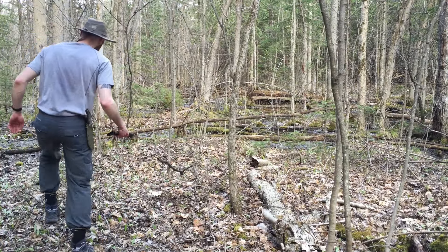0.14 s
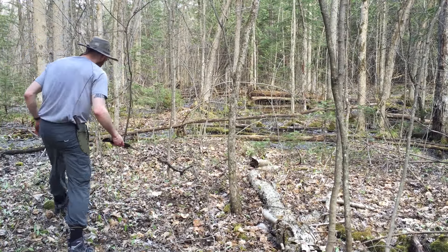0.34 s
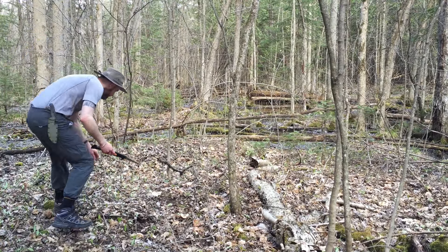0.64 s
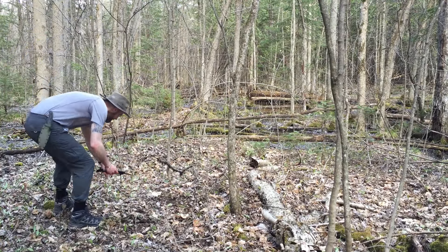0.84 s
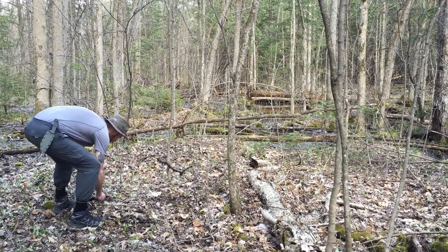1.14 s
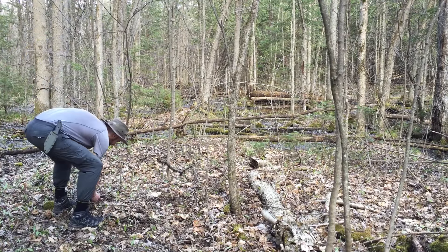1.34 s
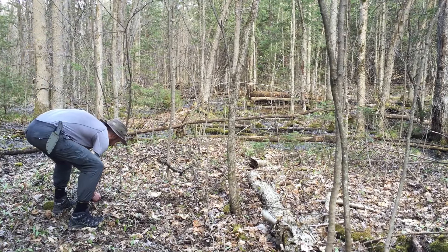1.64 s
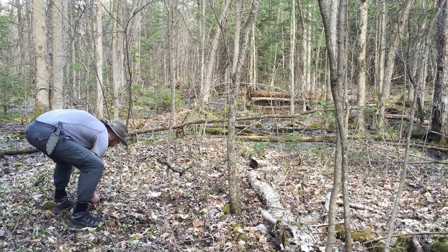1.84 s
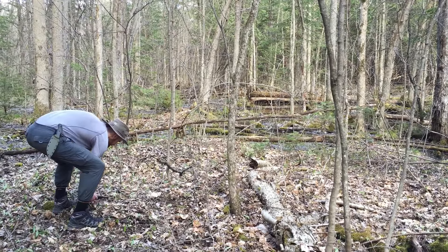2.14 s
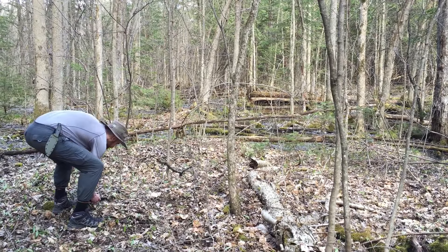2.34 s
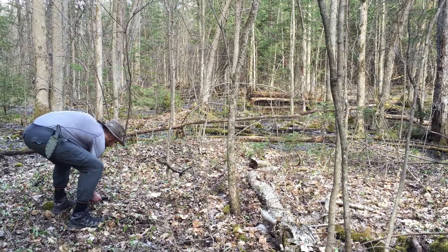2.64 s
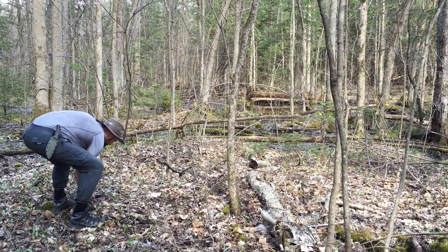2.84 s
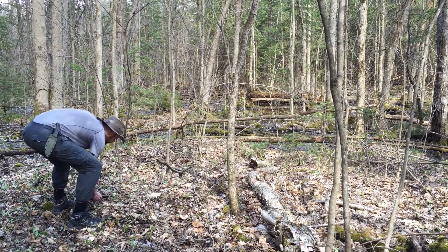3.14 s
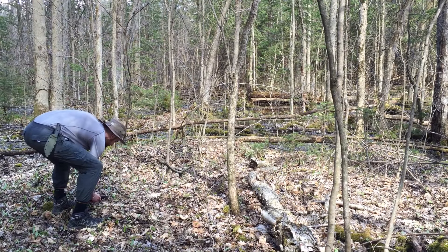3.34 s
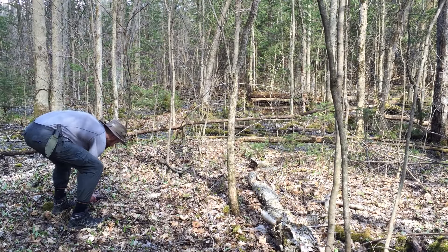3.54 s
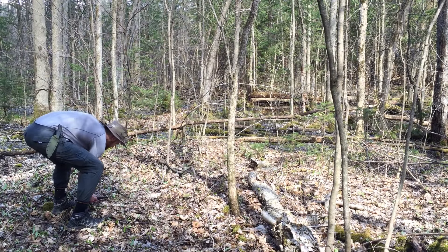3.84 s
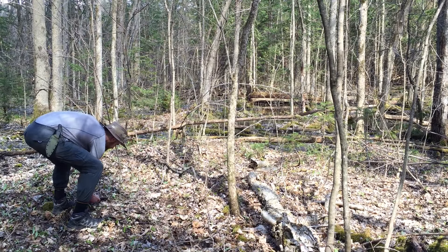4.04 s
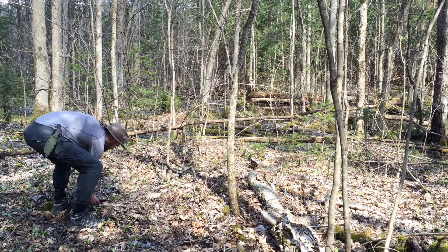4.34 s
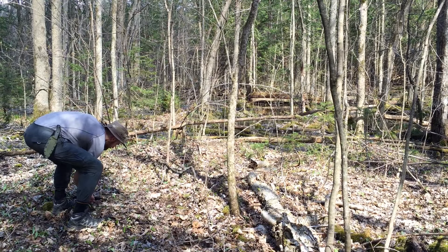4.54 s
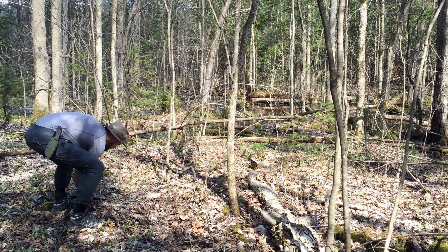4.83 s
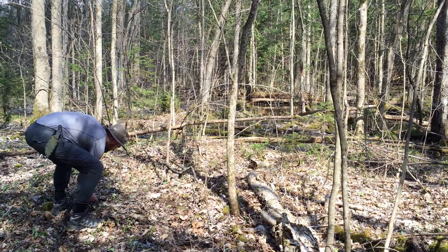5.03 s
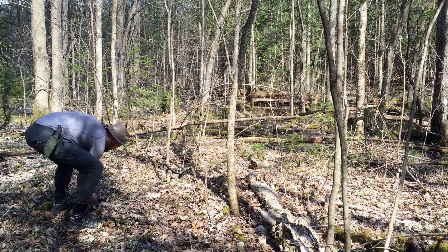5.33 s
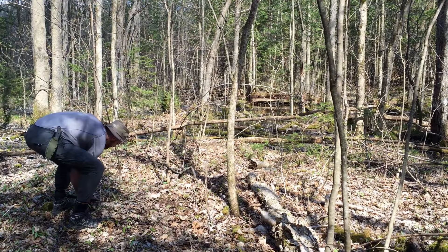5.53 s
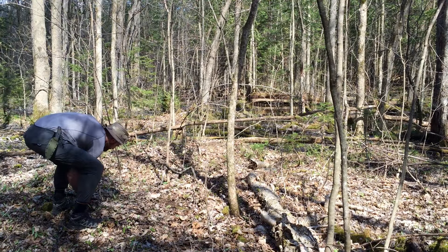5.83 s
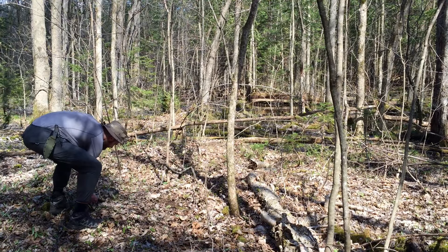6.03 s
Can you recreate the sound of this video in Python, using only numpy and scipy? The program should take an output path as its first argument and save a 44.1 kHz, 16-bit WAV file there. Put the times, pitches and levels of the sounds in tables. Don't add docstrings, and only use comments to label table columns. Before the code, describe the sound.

Quiet open forest, heard by a small fixed microphone a few metres away, with a very short scatter off ground and trunks. From 0 to about 1.1 s boots press into dry leaves: soft crunches, strongest near 0.5 and 0.9 s, with dull ticks and a faint low thud as a foot lands. The litter almost settles until 1.6 s. From 1.7 to 3.2 s a small blade probes lightly: brief separate scrapes, thin twig clicks, soft soil thuds around 2.2-2.9 s, and a firmer crackling scratch near 2.9 s. From 3.6 s to the end at about 6.2 s come firm back-and-forth strokes, roughly one every 0.15 s, gritty and papery, with woody snaps; loudest around 5.4 s. Underneath, a faint distant engine-like hum and deeper rumble swell slowly, strongest around 5.3 s, with thin steady air hiss.

```python
import sys
import numpy as np
from scipy import signal
from scipy.io import wavfile
from scipy.ndimage import uniform_filter1d

SR = 44100
rng = np.random.default_rng(int(sys.argv[2]) if len(sys.argv) > 2 else 0)


def to_linear_factor(level_db):
    exponent = np.asarray(level_db, float) / 20
    return 10 ** exponent


def inscribe(sig):
    pcm = np.round(np.clip(np.atleast_2d(sig).T, -1, 1) * 32767)
    wavfile.write(sys.argv[1], SR, pcm.astype(np.int16))


N = 272538
HZ = np.fft.rfftfreq(8192, 1 / SR) + 1
SPLIT_HZ = 1830


def blade_work():
    # peak in s, rise in s, fall in s, scrape in dB, dryness in dB.
    probes = [
        (1.68, .07, 0.039, -55, 3.5),
        (2.08, 0.066, 0.073, -58.5, 7.5),
        (2.235, 0.048, .07, -58, 8),
        (2.42, 0.05, 0.053, -55, 2),
        (2.538, 0.032, 0.051, -50, 3),
        (2.74, 0.058, 0.076, -55, 3.5),
        (2.9, 0.072, 0.08, -45.5, -3.5),
        (3.08, 0.076, .05, -59, -1),
        (3.219, 0.011, 0.0083, -63.5, 19),
    ]
    # peak in s, rise in s, fall in s, scrape in dB, dryness in dB.
    strokes = [(3.654, 0.085, 0.057, -48.5, -4.5), (3.809, 0.066, 0.058, -46, -6.5),
               (3.979, 0.095, 0.1, -54, -5), (4.123, 0.021, 0.054, -44, -3.5),
               (4.304, 0.075, 0.04, -45, -4.5), (4.454, 0.091, 0.038, -45, -5.5),
               (4.63, 0.11, 0.024, -46, 1.5), (4.78, 0.1, 0.046, -48.5, -4.5),
               (4.949, 0.087, 0.074, -45.5, -3), (5.121, 0.085, 0.046, -45, -1),
               (5.27, 0.061, 0.058, -41.5, -3.5), (5.42, 0.055, 0.068, -35.5, -11.5),
               (5.575, 0.076, 0.088, -44, -4), (5.721, 0.045, 0.095, -44, -5),
               (5.93, 0.068, 0.074, -40.5, -5.5), (6.06, 0.051, 0.12, -45.5, -9.5)]
    # start in s, peak in dB, ring in Hz, brightness in dB.
    low_twigs = [(2.357, -41.5, 1296, -19), (2.708, -34.5, 1383, -27), (2.838, -40, 1180, -2.5),
                 (2.87, -28.5, 998, 0.5), (2.93, -31.5, 1230, -5.5), (2.956, -27, 1170, -14),
                 (3.051, -40.5, 1290, -6.5), (3.097, -48, 1216, 0.5), (3.218, -41.5, 1240, -8),
                 (3.618, -37.5, 1057, 5), (3.652, -26.5, 1224, -8), (3.679, -31, 1223, -11),
                 (3.832, -39.5, 980, -5), (3.911, -40.5, 1080, -6), (4.094, -43.5, 1240, -4.5),
                 (4.319, -30, 1272, -11.5), (4.429, -35.5, 874, 1), (4.63, -28.5, 1240, -6),
                 (4.917, -39, 1290, 2.5), (4.945, -32, 976, -8), (5.209, -31, 1235, -9.5),
                 (5.256, -30.5, 1095, -13), (5.305, -28.5, 1150, -7.5), (5.393, -30, 1236, -29),
                 (5.442, -27, 1110, -6), (5.546, -32, 1180, -6), (5.567, -33, 1056, -12),
                 (5.628, -31, 1184, -11), (5.863, -45.5, 1140, -2), (5.934, -27, 1170, -7)]
    # start in s, peak in dB, ring in Hz, brightness in dB.
    thin_twigs = [(1.653, -47, 2160, -1.5), (1.692, -32, 2110, -30), (1.712, -43, 2120, -3.5),
                  (1.827, -46.5, 2200, -7.5), (2.218, -42.5, 2100, -2), (2.534, -36, 2780, -19),
                  (2.906, -34, 2240, -2), (3.063, -38, 2180, -15), (3.594, -34.5, 2316, -8.5),
                  (3.961, -35.5, 2120, -3), (3.971, -28, 2580, 2.5), (4.004, -34, 2100, -4.5),
                  (4.126, -38, 2020, -1), (4.235, -50, 2100, 2.5), (4.3, -29, 2030, -12),
                  (4.555, -36, 1960, -5), (4.597, -33, 2174, -10), (4.758, -37, 2190, -17),
                  (4.975, -31.5, 1650, -3.5), (5.05, -45, 2100, -1), (5.117, -23.5, 2100, -32),
                  (5.279, -32.5, 1690, 3), (5.418, -19, 2100, -16), (5.582, -22, 2100, -8),
                  (5.608, -29, 2050, -25), (5.724, -35, 2040, -31), (5.885, -40, 2110, 1),
                  (5.912, -30.5, 2000, -1), (6.059, -28.5, 2100, -29), (6.131, -50, 2550, 11)]
    # centre in Hz, width in Hz, level in dB.
    blade_modes = [(715, 61, -4.5), (980, 25, 3.5), (1201, 108, 3), (1605, 290, -3), (2033, 330, -4),
                   (2170, 187, 2), (2498, 490, -5), (2900, 220, -17)]
    low_t60_s, thin_t60_s = 0.034, 0.028
    longer_per_dull_db = 0.014

    scrape = grit(per_s=4000, spread_db=5.5, clump_db=1.5, clump_s=0.00043, smooth=0.27)
    hits = [(*row, low_t60_s) for row in low_twigs] + [(*row, thin_t60_s) for row in thin_twigs]
    hits = [(*row, t60_s * (1 - longer_per_dull_db * row[3])) for *row, t60_s in hits]
    twigs, knocks = snaps(hits, ring_db=-5.0, knock_db=-11, crack_db=-4.0, lean_db=1)
    gains = levels(probes, round_top=1.3, sudden_stop=2.1, rise_db=10.0, fall_db=15, end_dry_db=1.5,
                   upper=(-3, .6), fizz=(-11, .8, 3), back_db=(-1.5, -1.5))
    gains = gains + levels(strokes, round_top=1.48, sudden_stop=1.6, rise_db=13.5, fall_db=21.5, end_dry_db=10,
                           upper=(-2.5, .3), fizz=(-7, .7, 7), back_db=(-1.5, -5))
    return twigs + crushed(gains, blade_modes, to_linear_factor(-5) * scrape, knocks, patchy_db=4.5)


def footsteps():
    # peak in s, rise in s, fall in s, crunch in dB, dryness in dB.
    presses = [(.02, 0.06, 0.44, -68.5, -2), (.35, 0.045, 0.11, -63, -21), (.455, 0.068, 0.074, -53, 5.5),
               (.542, 0.092, .18, -49, -0.5), (.66, 0.037, 0.065, -72.5, 13), (.79, 0.14, 0.12, -65.5, -1),
               (.91, 0.048, 0.066, -44, 1.5), (1.02, 0.047, 0.037, -48.5, -5), (1.12, 0.11, 0.17, -72, 1.5),
               (1.3, 0.075, 0.14, -70, 3), (1.396, 0.026, 0.073, -76, -15), (1.58, 0.13, 0.065, -70, 2),
               (1.838, 0.046, .05, -75.5, 9)]
    # start in s, peak in dB, ring in Hz, brightness in dB, t60 in s.
    tick_events = [(0.025, -38.5, 980, -0.5, 0.011), (0.175, -30.5, 2100, -25, 0.006),
                   (0.339, -24.5, 1230, -31, 0.0036), (0.342, -30, 1190, -22, 0.0085),
                   (0.361, -36.5, 1700, -21, 0.015), (0.376, -32, 1190, -33, 0.014),
                   (0.384, -37, 980, -24, 0.018), (0.442, -40.5, 1550, 1.5, 0.019),
                   (0.464, -34, 1580, -2, 0.021), (0.545, -33, 980, -26, 0.018),
                   (0.717, -53, 1010, 8, 0.0088), (0.882, -45, 960, -17, 0.012),
                   (1.012, -24.5, 1630, -10.5, 0.0059), (1.192, -48, 1060, -15, 0.013),
                   (1.364, -51, 2200, -9, 0.023), (1.394, -34, 1050, -33, 0.015),
                   (1.5, -52.5, 1310, -8.5, 0.042)]
    # centre in Hz, width in Hz, level in dB.
    litter_modes = [(690, 170, -13.5), (1004, 137, -4), (1514, 430, -9.5), (2100, 190, 5), (2650, 380, -6)]
    tread = grit(per_s=6000, spread_db=1.0, clump_db=0.7, clump_s=0.0025, smooth=0.6)
    ticks, kicks = snaps(tick_events, ring_db=-2.5, knock_db=-12.5, crack_db=0.0, lean_db=3)
    gains = levels(presses, round_top=1.4, sudden_stop=1.35, rise_db=11.5, fall_db=23.5, end_dry_db=6.5,
                   upper=(-15, .3), fizz=(-10, .9, 1.5))
    return ticks + crushed(gains, litter_modes, to_linear_factor(-3.0) * tread, kicks, patchy_db=4.0)


def levels(events, round_top, sudden_stop, rise_db, fall_db, end_dry_db, upper, fizz, back_db=(0, 0)):
    out = np.zeros((4, N))
    for n, (s, rise_s, fall_s, db, dry_db) in enumerate(events):
        upper_db, fizz_db = np.array([upper[0], fizz[0]]) + n % 2 * np.array(back_db)
        t = np.arange(max(s - rise_s - .05, 0), s + fall_s + .05, 1 / SR)
        place = np.minimum(np.where(t < s, (s - t) / rise_s, (t - s) / fall_s), 1)
        outside_s = np.maximum(s - rise_s + 0.015 - t, t - s - fall_s + 0.014)
        settle_db = 556 * np.maximum(outside_s, 0)
        bend = np.where(t < s, round_top, sudden_stop)
        main_db = db - np.where(t < s, rise_db, fall_db) * place ** bend - settle_db
        crackle_db = dry_db + end_dry_db * place * (t > s)
        high_db = fizz_db + fizz[1] * crackle_db - fizz[2] * place
        for k, rel_db in enumerate([0, upper_db + upper[1] * dry_db, crackle_db, high_db]):
            add(out[k], t[0], to_linear_factor(main_db + rel_db))
    return out


def grit(per_s, spread_db, clump_db, clump_s, smooth):
    size = to_linear_factor(spread_db * np.minimum(rng.exponential(1, N), 4)) * rng.choice([-1, 1], N)
    breaks = evened(size * (rng.random(N) < per_s / SR))
    smooth = np.clip(smooth, 0, 1)
    rubbing = rng.standard_normal(N)
    return wander(clump_db, clump_s) * (np.sqrt(1 - smooth) * breaks + np.sqrt(smooth) * rubbing)


def crushed(gains, body, drive, knocks, patchy_db):
    # centre in Hz, width in Hz, level in dB.
    leaf_modes = [(3860, 170, -11), (4470, 580, 4), (4777, 500, 2.5), (5073, 373, -3), (5463, 910, -0.5),
                  (6560, 1300, -42)]
    # frequency in Hz, level in dB per Hz.
    fizz_spectrum = [(5600, -30), (6700, -4), (7800, 2), (8900, 0), (9700, -8), (10500, -13), (11300, -8),
                     (15950, -12)]
    low, upper, mid, high = gains * drive + knocks
    n_low = sum(mode[0] < SPLIT_HZ for mode in body)
    ring = rung(low, body[:n_low], patchy_db, steep=0.93)
    ring = ring + rung(upper, body[n_low:], patchy_db, steep=2.0)
    crackle = rung(mid, leaf_modes, patchy_db, steep=1.533)
    return ring + crackle + coloured(high * wander(3, .006), spectrum_db(fizz_spectrum))


def snaps(events, ring_db, knock_db, crack_db, lean_db):
    less_knock_per_dull_db = 0.19
    ring, bursts, t = np.zeros(N), np.zeros((3, N)), np.arange(3000) / SR
    for s, db, hz, bright_db, t60_s in events:
        t60_s = max(t60_s, .005)
        onset_s = 0.018 * t60_s * to_linear_factor(-.45 * bright_db)
        dying = to_linear_factor(db - 60 * t / t60_s) * (1 - np.exp(-t / onset_s))
        upper = hz > SPLIT_HZ
        knock, crack = rng.standard_normal((2, len(t)))
        knock = knock * to_linear_factor(3 + less_knock_per_dull_db * bright_db)
        add(ring, s, dying * np.sin(2 * np.pi * hz * t))
        add(bursts[0], s, dying * to_linear_factor(knock_db - lean_db * upper) * knock)
        add(bursts[1], s, dying * to_linear_factor(knock_db - 0.5 - lean_db * (2 - upper)) * knock)
        add(bursts[2], s, dying * to_linear_factor(1.0 + crack_db + bright_db - 25 * t / t60_s) * crack)
    return to_linear_factor(ring_db) * ring, np.array([*bursts, to_linear_factor(-15) * bursts[2]])


def rung(drive, modes, patchy_db, steep):
    share = np.array([to_linear_factor(db) * np.sqrt(width_hz) for hz, width_hz, db in modes])
    share = share / np.linalg.norm(share)
    return sum(g * coloured(drive * wander(patchy_db, 0.0093), mode_db(hz, width_hz, steep))
               for g, (hz, width_hz, db) in zip(share, modes))


def mode_db(hz, width_hz, steep):
    dip_hz, dull_hz = 3230, 7000
    beyond = (HZ / dip_hz) ** (14 if hz < dip_hz else -14)
    skirt = (1 + (2 * (HZ - hz) / width_hz) ** 2) ** steep * (1 + (HZ / dull_hz) ** 16)
    return -10 * np.log10(skirt * (1 + np.minimum(beyond, 300)) * (1 + (330 / HZ) ** 4))


def thuds():
    # start in s, peak in dB, pitch in Hz, t60 in s.
    pushes = [
        (0.872, -53, 199, 0.34),
        (2.239, -48, 204, 0.34),
        (2.399, -54.5, 216, 0.22),
        (2.53, -49.5, 217, 0.099),
        (2.93, -47.5, 198, 0.13),
        (3.658, -57, 299, 0.19),
    ]
    out, t = np.zeros(N), np.arange(8000) / SR
    for s, db, hz, t60_s in pushes:
        add(out, s, to_linear_factor(db - 60 * t / t60_s) * (1 - np.exp(-t / 0.0025)) * np.sin(2 * np.pi * hz * t))
    return out


def trunks(x):
    t = np.arange(6000) / SR
    taps = rng.standard_normal(len(t)) * (rng.random(len(t)) < .05) * to_linear_factor(-60 * t / 0.074) * (t > .002)
    return signal.oaconvolve(x, taps / np.linalg.norm(taps))[:N]


def drone():
    # time in s, level in dB.
    hum_swell = [(0.0, -47), (0.3, -58), (0.67, -62.5), (2.01, -65), (2.56, -63), (2.65, -74), (2.72, -55),
                 (2.81, -65.5), (2.96, -57.5), (3.03, -65.5), (3.31, -53), (3.54, -53), (3.82, -62),
                 (4.17, -56.5), (4.66, -57), (5.33, -47), (6.11, -55.5), (6.18, -64.5)]
    # time in s, centre in Hz, level in dB.
    rumble_path = [
        (0, 70.4, -61.5),
        (1.4, 76.34, -66.5),
        (2.3, 71, -65),
        (2.9, 64, -68),
        (3.6, 62, -68.5),
        (4.6, 59.6, -64.5),
        (5.2, 58.1, -58.5),
        (5.7, 55, -62),
        (6.18, 51.5, -66),
    ]
    # frequency in Hz, level in dB per Hz.
    hum_spectrum = [(85, -40.5), (105, -4.5), (135, -2), (152, -2), (168, 1), (185, -2), (226, -19),
                    (300, -46)]
    # frequency in Hz, level in dB per Hz.
    rumble_spectrum = [(15, -44), (25, -15), (53, -9.5), (86, -3), (110, -8), (140, -22), (240, -120)]
    strand_hz, strand_db = 166.4, -4

    t, (s, hz, db) = np.arange(N) / SR, np.transpose(rumble_path)
    hum = coloured(rng.standard_normal(N), spectrum_db(hum_spectrum))
    hum = hum + to_linear_factor(strand_db) * growl(strand_hz * wander(0.419, 0.1544), width_hz=17.2)
    rumble = to_linear_factor(-9.0) * coloured(rng.standard_normal(N), spectrum_db(rumble_spectrum))
    rumble = rumble + to_linear_factor(-7.0) * growl(np.interp(t, s, hz), width_hz=30)
    hum = to_linear_factor(np.interp(t, *np.transpose(hum_swell))) * steadied(hum, 0.099, share=0.13)
    return hum + to_linear_factor(np.interp(t, s, db)) * steadied(rumble, 0.19, share=0.3)


def growl(hz, width_hz):
    slow = rng.standard_normal((2, N))
    for _ in range(3):
        slow = uniform_filter1d(slow, int(SR / width_hz))
    carrier = np.exp(2j * np.pi * np.cumsum(hz * np.ones(N)) / SR)
    return evened(((slow[0] + 1j * slow[1]) * carrier).real)


def steadied(x, s, share):
    power = abs(uniform_filter1d(x ** 2, int(s * SR))) + 1e-3
    return evened(x / power ** (share / 2))


def air():
    # frequency in Hz, level in dB per Hz.
    air_spectrum = [(220, -7.5), (340, -14), (1200, -21), (2400, -21.5), (3300, -26), (4600, -23.5),
                    (7000, -29), (9500, -31), (10500, -34), (11500, -32), (15700, -37)]
    return to_linear_factor(-69) * coloured(wander(1.45, 0.016) * rng.standard_normal(N), spectrum_db(air_spectrum))


def evened(x):
    return x / np.sqrt(np.mean(x ** 2) + 1e-20)


def wander(db, s):
    width = int(s * SR)
    slow = uniform_filter1d(uniform_filter1d(rng.standard_normal(N), width), width)
    return evened(to_linear_factor(db * evened(slow)))


def add(mix, s, sound):
    part = mix[round(s * SR):][:len(sound)]
    part += sound[:len(part)]


def spectrum_db(points):
    f, db = np.transpose(points)
    return np.interp(np.log(HZ + 1), np.log(f + 1), db, -90, -90)


def coloured(x, db):
    log_gain = np.log(to_linear_factor(np.r_[db, db[-2:0:-1]]))
    taps = np.fft.ifft(np.exp(log_gain - 1j * signal.hilbert(log_gain).imag)).real[:4096]
    return signal.oaconvolve(x, taps / np.linalg.norm(taps))[:N]


def scene():
    near = blade_work() + footsteps()
    return (near + to_linear_factor(-8.0) * trunks(near) + thuds() + drone() + air())[None]


def band_limit(x):
    return signal.sosfilt(signal.butter(12, 16380, fs=SR, output="sos"), x)


def record(dry):
    edge_hz = 15850
    taps = signal.firwin(511, edge_hz, window=("kaiser", 9), fs=SR)
    limited = signal.oaconvolve(dry, taps[None], "same")
    return band_limit(limited)


dry = scene()
out = record(dry)
inscribe(out)
```